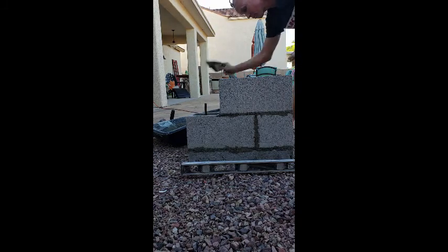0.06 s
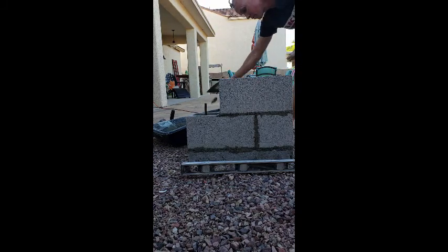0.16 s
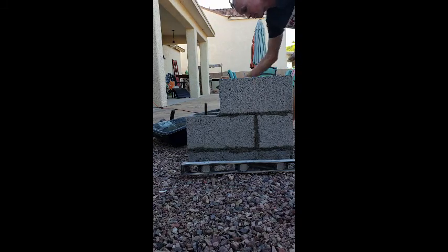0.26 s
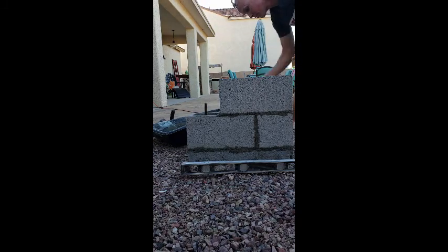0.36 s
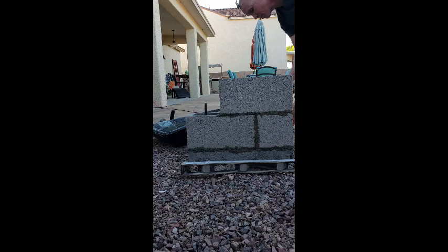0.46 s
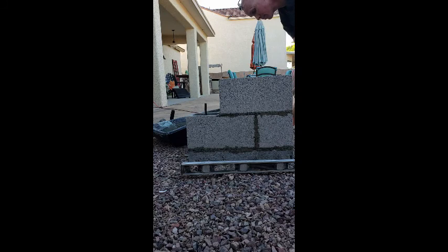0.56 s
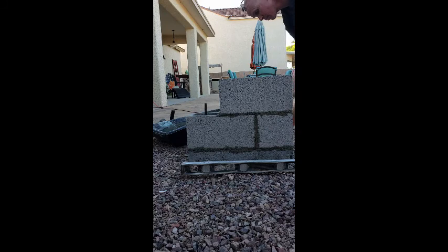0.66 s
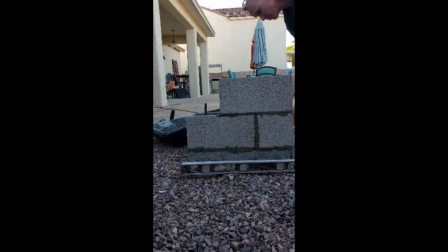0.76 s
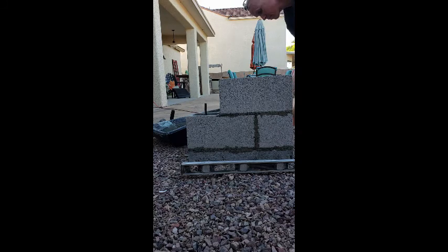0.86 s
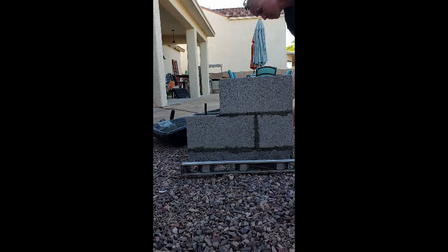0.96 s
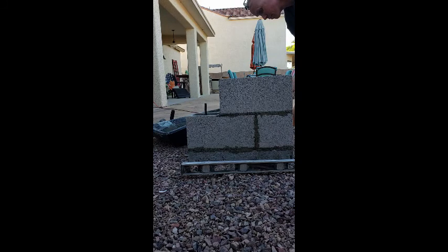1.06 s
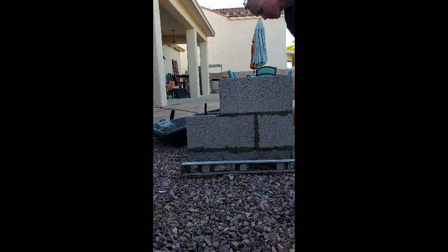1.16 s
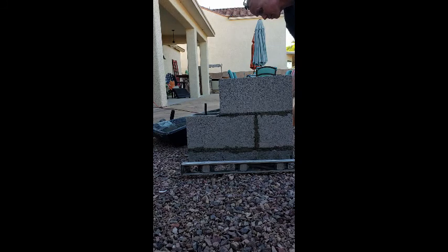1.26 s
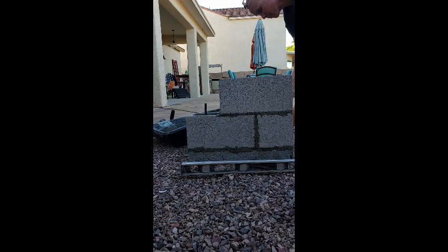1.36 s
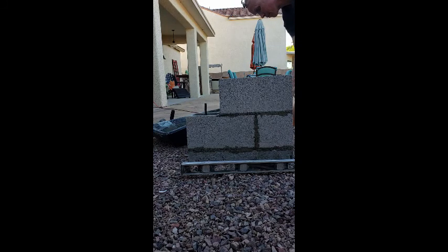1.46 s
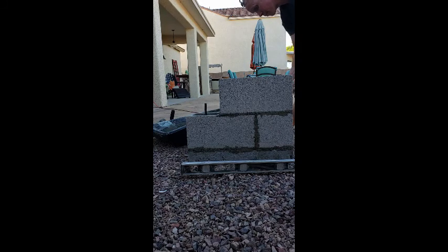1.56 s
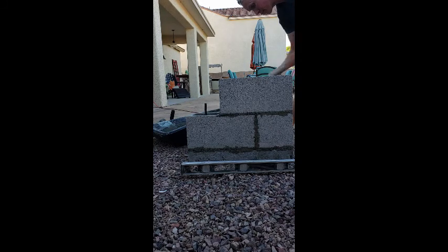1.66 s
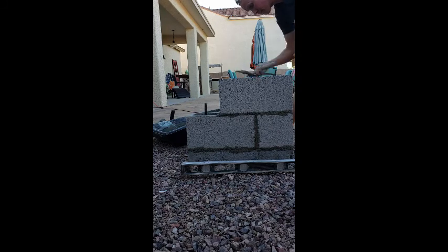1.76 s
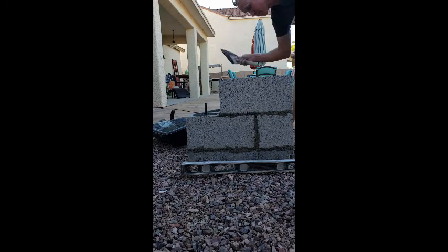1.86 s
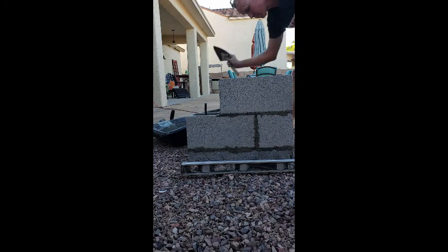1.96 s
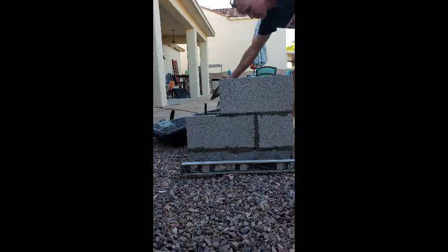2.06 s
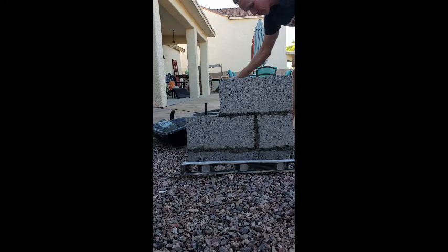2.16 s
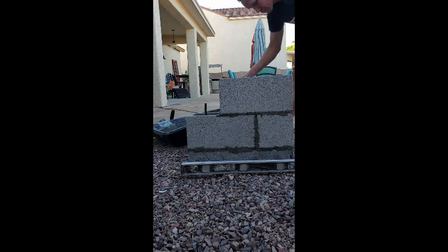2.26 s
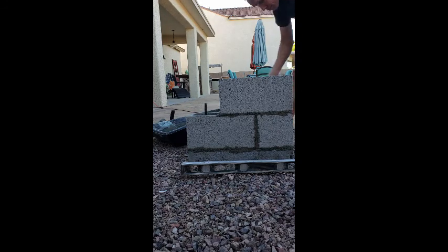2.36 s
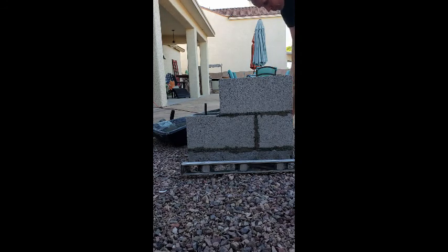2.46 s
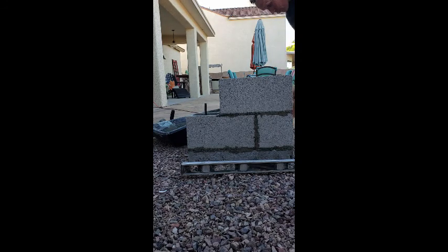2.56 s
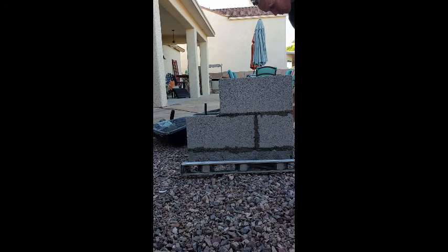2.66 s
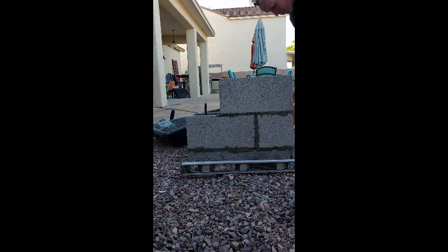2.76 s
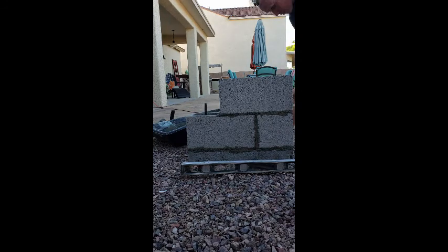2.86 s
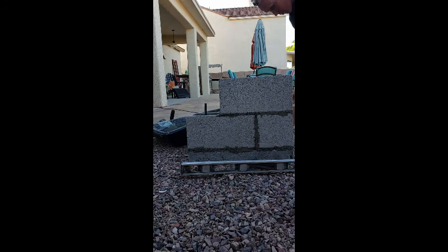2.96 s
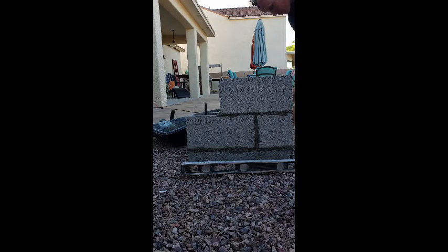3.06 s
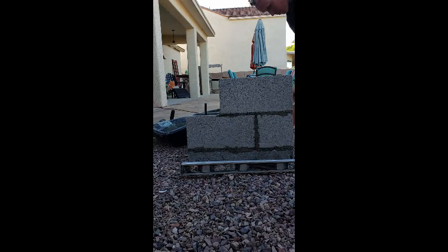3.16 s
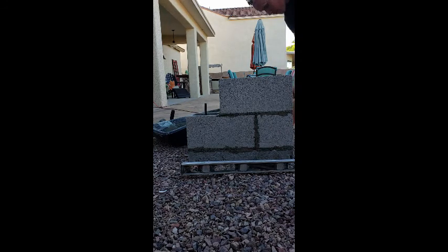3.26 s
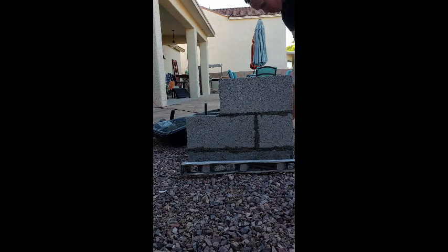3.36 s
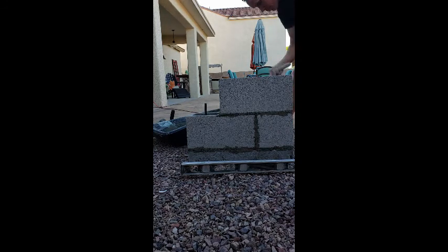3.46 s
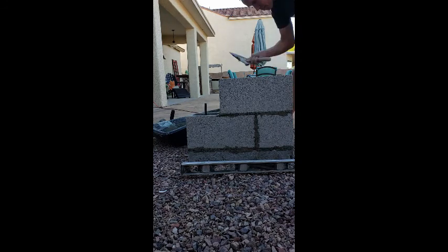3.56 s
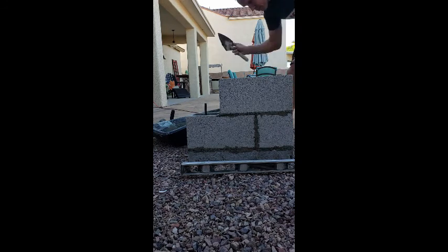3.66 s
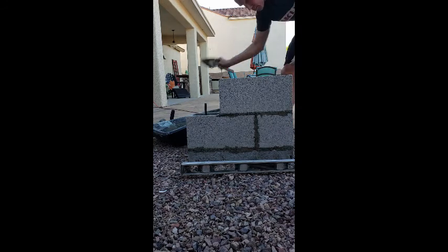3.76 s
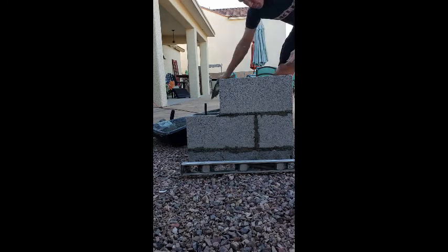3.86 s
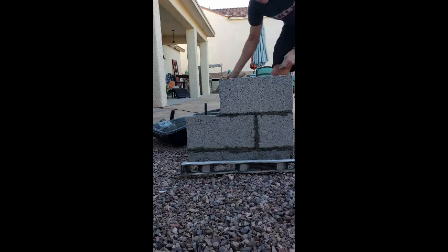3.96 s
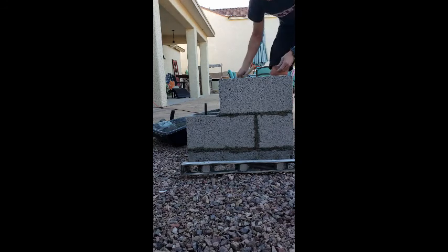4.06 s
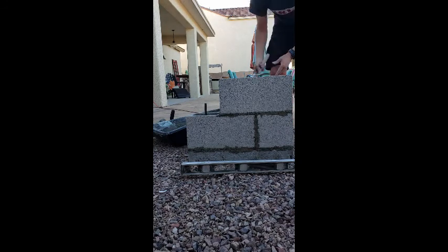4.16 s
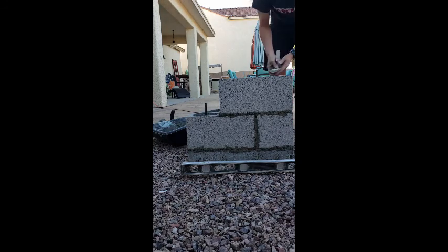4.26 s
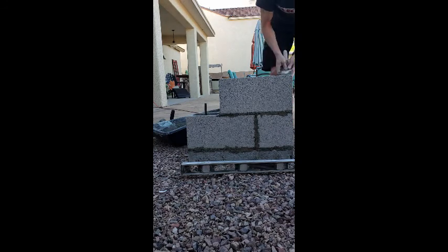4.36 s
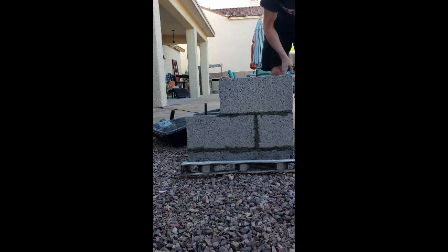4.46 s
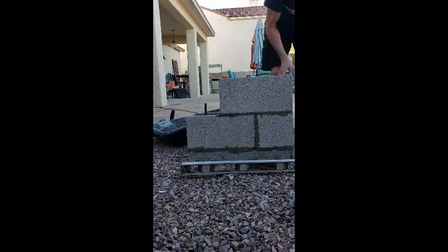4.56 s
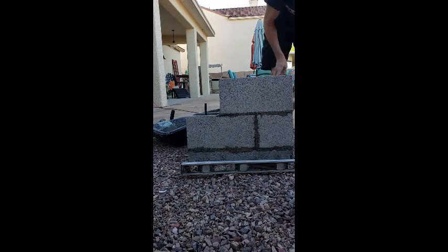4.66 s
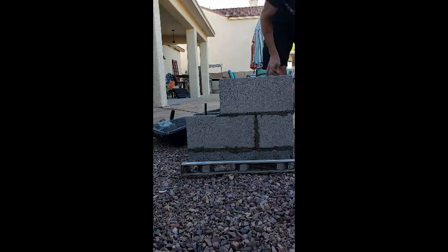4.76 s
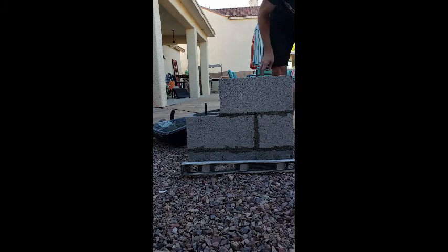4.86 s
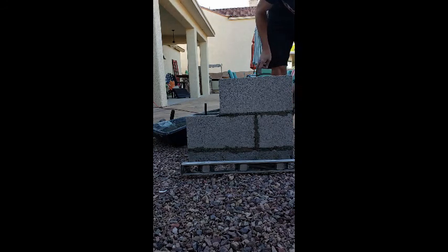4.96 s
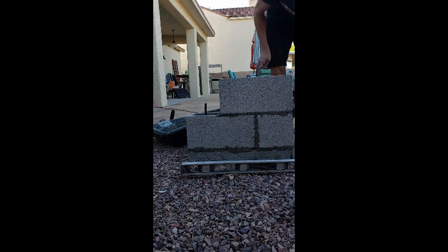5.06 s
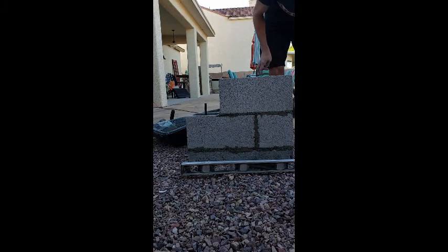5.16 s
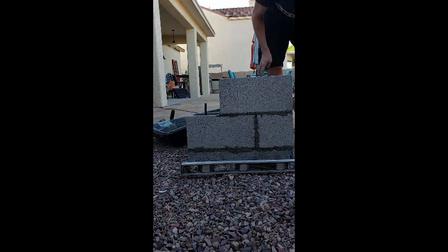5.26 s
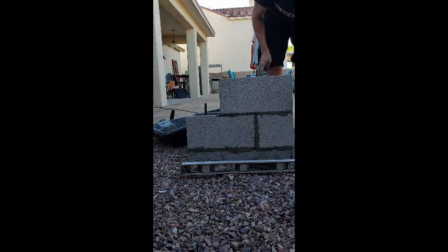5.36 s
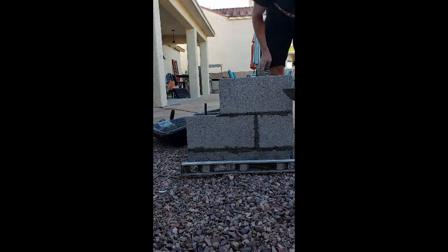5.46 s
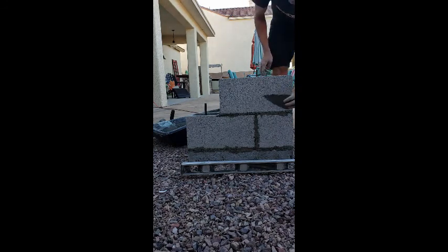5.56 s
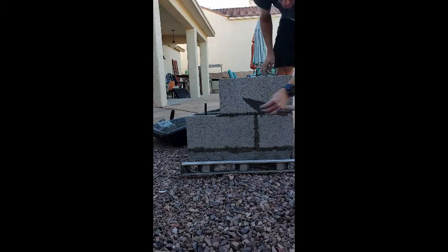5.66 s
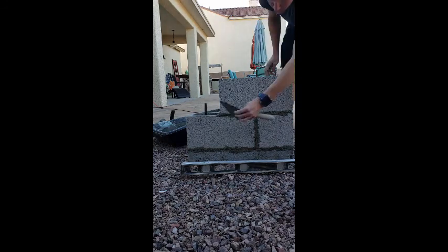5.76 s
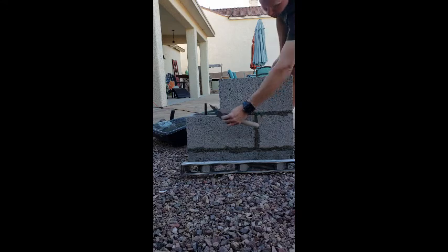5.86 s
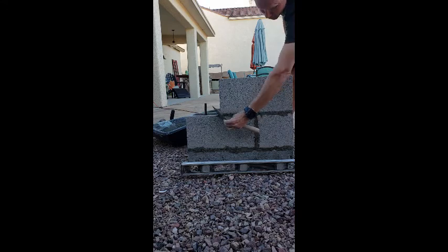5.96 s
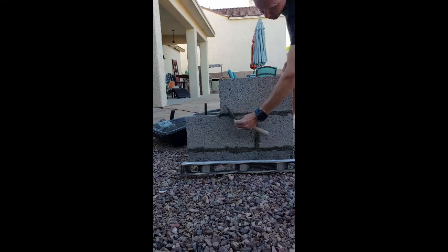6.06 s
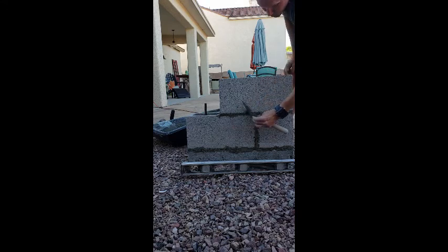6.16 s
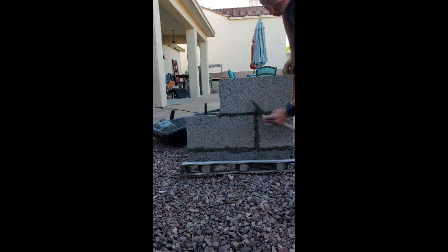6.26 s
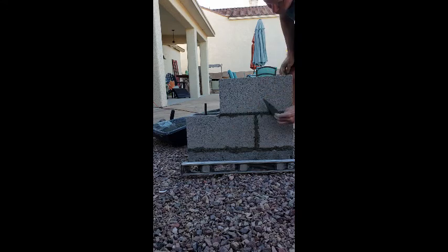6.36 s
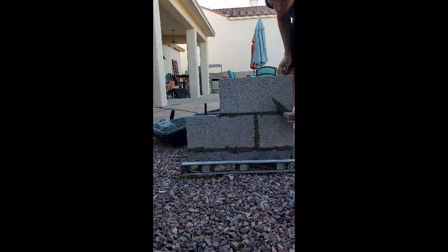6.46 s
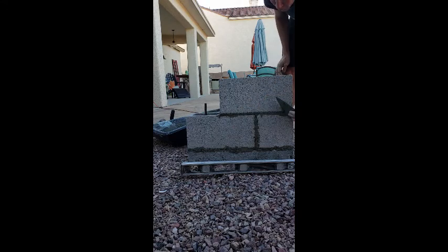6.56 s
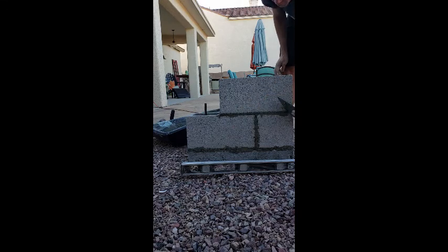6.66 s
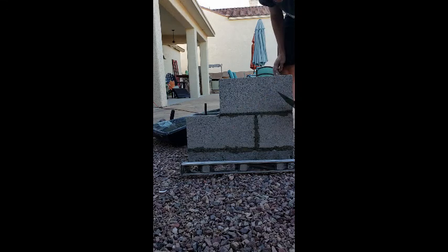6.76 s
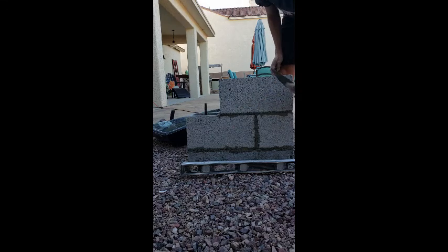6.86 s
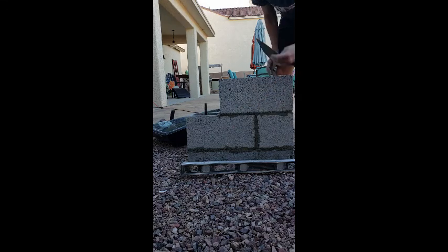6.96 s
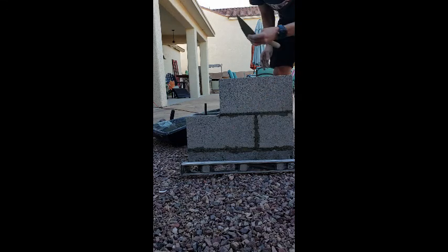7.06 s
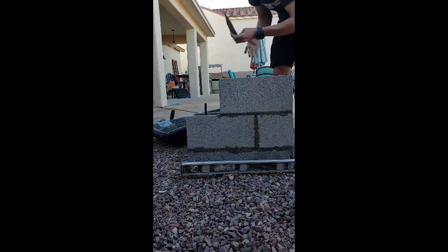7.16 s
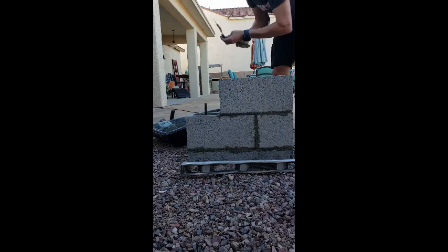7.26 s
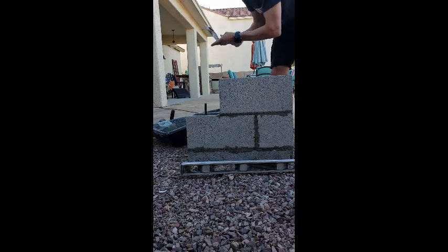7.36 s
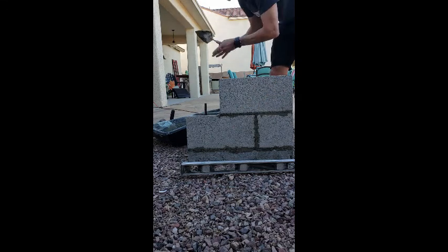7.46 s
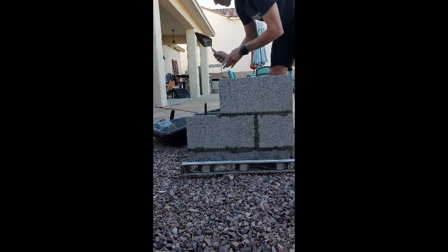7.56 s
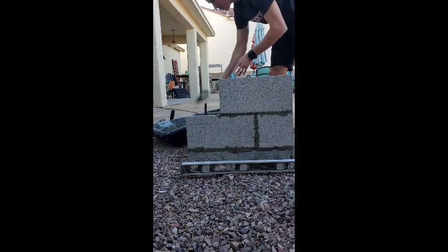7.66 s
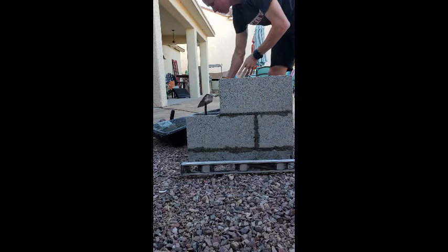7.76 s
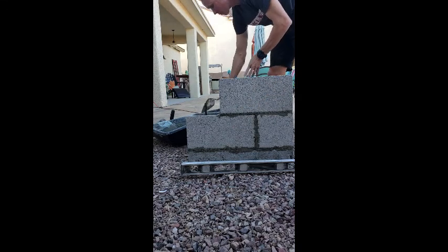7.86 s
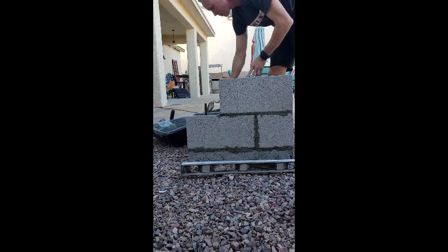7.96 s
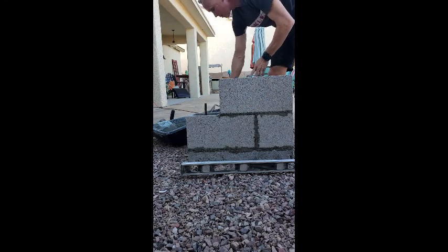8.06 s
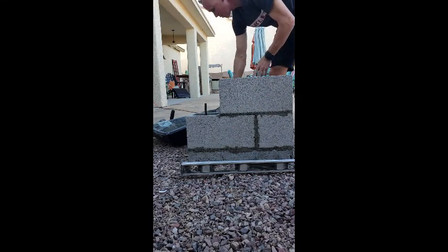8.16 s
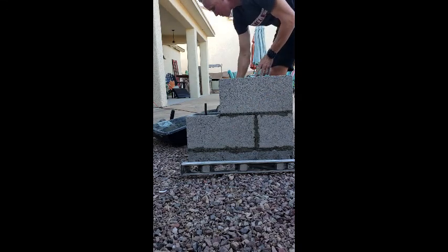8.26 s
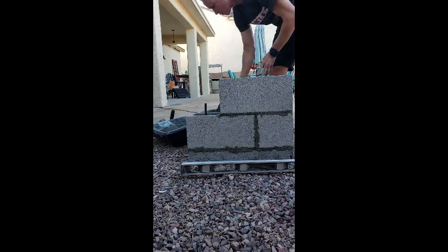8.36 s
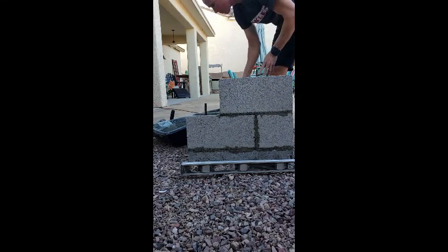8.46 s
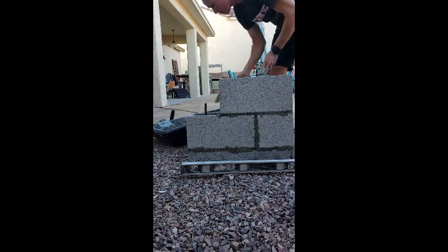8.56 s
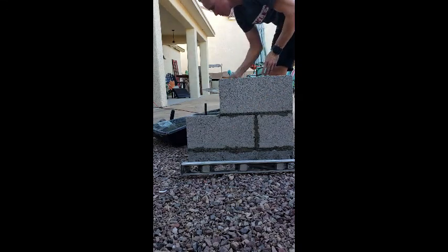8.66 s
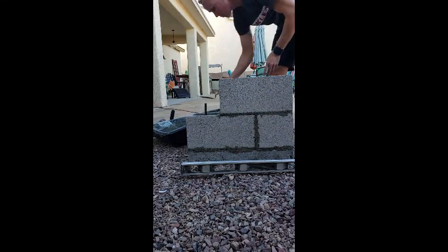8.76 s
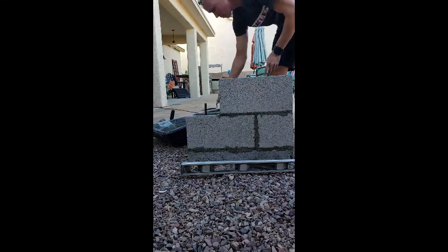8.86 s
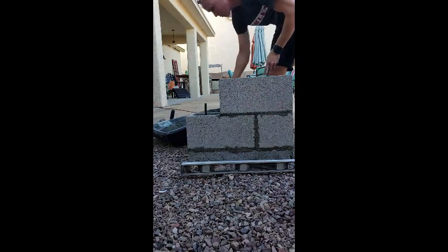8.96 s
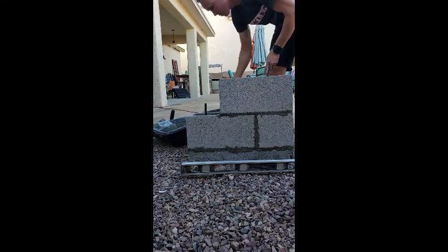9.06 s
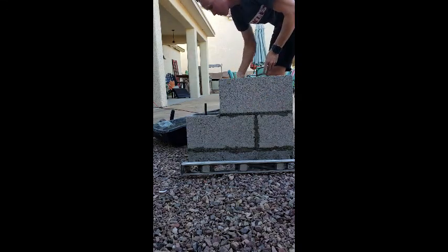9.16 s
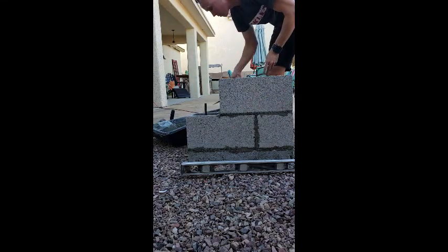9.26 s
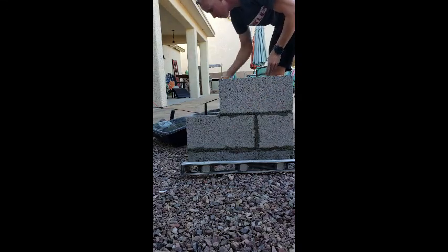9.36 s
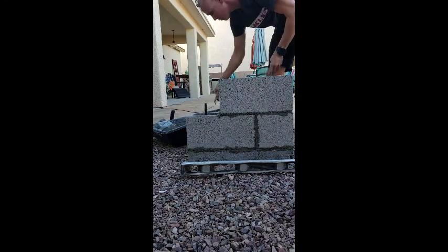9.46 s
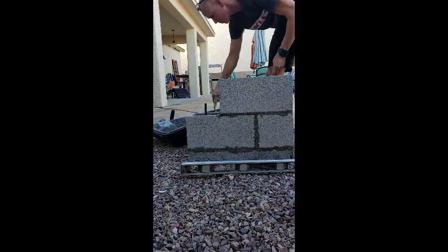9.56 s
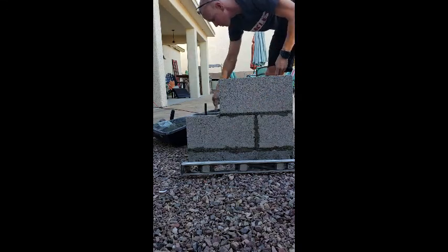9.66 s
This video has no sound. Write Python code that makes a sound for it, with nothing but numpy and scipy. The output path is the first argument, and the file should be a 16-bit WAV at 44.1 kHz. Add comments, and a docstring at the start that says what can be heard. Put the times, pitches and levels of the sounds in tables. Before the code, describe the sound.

A back yard with low rumble, thin hiss and a faint distant machine hum throughout; the trowel is close, with short reflections from house walls. From 0 to 1.4 s there are faint scrapes, small ticks and soft block knocks. Around 1.5 s two sharp ticks land with a short scrape. A large dog barks far off at 1.8 s, and a low thump falls at 2.4. Light gritty strokes follow from 2.7 to 3.3, the last stronger. From 3.4 to 4.6 there is quiet mortar smearing, with knocks, gravel clacks and falling crumbs. Harsh, squealing edge scrapes come at 4.8 to 5.3, with a bark at 5.2, and gravel clicks at 5.6. A long loud rasp runs 5.9 to 6.7, overlapping another bark. Then it is sparse: a very faint bark at 7.3, a short one at 8.0, knocks and scraping at 8.15, a brief steel ring at 8.45, and a solid dull knock with mortar scrape at 8.9.

```python
"""Back yard: a steel trowel scrapes wet mortar off a low concrete block wall.
Blade: random sand-grain snaps shaped by push and steel resonances, plus ticks, skids and squeals.
Blocks knock, one low thump falls and gravel clacks: damped tones and filtered noise bursts.
Far off, a large dog barks five times: rough pulses through throat resonances.
Background: low rumble and thin hiss of filtered noise, and a faint machine hum of wavering sines."""
import sys
import numpy as np
from scipy import signal
from scipy.fft import rfft, irfft
from scipy.io import wavfile

SR = 44100
rng = np.random.default_rng(int(sys.argv[2]) if len(sys.argv) > 2 else 0)


def unload_audio(sound):
    """Save the sound as a 16-bit wav file, at the path given as the first command line argument."""
    columns = np.transpose(np.atleast_2d(sound))
    # keep every value between -1 and 1, then stretch to whole-number steps
    steps = np.round(np.clip(columns, -1, 1) * 32767)
    wavfile.write(sys.argv[1], SR, steps.astype(np.int16))


N = 428634
TIME = np.arange(N) / SR
HZ = np.fft.rfftfreq(4096, 1 / SR)
BAND_EDGE_HZ = 16050


# blade colour, one table per way of holding it: hz, density_db_per_hz (relative)
LIGHT_COLOUR = [(150, -26), (340, -7.5), (560, -13), (780, -18), (950, -6.5), (1150, -14), (1500, -7),
                (2000, -9.5), (3400, -3), (5000, -3), (6500, -7), (9500, -9.5), (12200, 3), (16000, -6.5)]
EDGE_COLOUR = [(150, -19), (330, -12), (520, -13.5), (750, -13.5), (940, -8.5), (1160, -23), (1450, -12.5),
               (1900, -9.5), (2900, -7), (5000, -9.5), (7200, -10.5), (9400, -12.5), (11000, -6.5),
               (12400, 3), (16000, -13.5)]
FACE_COLOUR = [(150, -20.5), (300, -15), (520, -1.5), (690, -13.5), (880, 1), (1120, -6.5), (1350, 0.5),
               (2050, -10.5), (2700, -2), (3300, 0), (5100, -3), (6000, -11.5), (7400, -4.5), (10000, -15),
               (12400, 0), (16000, -8)]
MORTAR_COLOUR = [(50, -23), (120, -1.5), (220, -8.5), (330, -3), (490, 4.5), (620, -3.5), (720, -5.5),
                 (1200, -12.5), (1420, -12), (1800, -14.5), (2450, -13), (3400, -13.5), (5000, -14.5),
                 (9500, -23), (12300, -13.5), (16000, -23)]


def trowel():
    """Four ways of working the blade, each with its own grit and colour."""
    light = singing(scrape("light", grit(2200, 3.5, 0.94, 180), level_db=0.0))
    light = light + ticks() + crumbs()
    edge = singing(scrape("edge", grit(6000, 3.6, 1.3, 260), level_db=-0.5) + skids())
    face = scrape("face", grit(5000, 3.1, 2.4, 300), level_db=-1.5)
    mortar = scrape("mortar", grit(4000, 4.0, 1.33, 220), level_db=1.5)
    return (roaming(light, lambda: steel(LIGHT_COLOUR, ring_db=-2.0))
            + roaming(edge, lambda: steel(EDGE_COLOUR, ring_db=0.0))
            + roaming(face, lambda: steel(FACE_COLOUR, ring_db=-1.0, side=0.35))
            + roaming(mortar, lambda: steel(MORTAR_COLOUR, ring_db=-5, side=0.24)))


# trowel strokes: start_s, lean_in_s, hold_s, ease_off_s, level_db (before the way's level),
# low_body_db, way
STROKES = [ (0.133, 0.042, .005, .03, -56, -14.5, "light"), (.29, 0.015, .01, .06, -56.5, 9, "light"),
           (0.358, .01, .01, 0.07, -61.5, 5, "light"), (1.126, 0.12, 0.0073, .11, -39.5, 0.5, "light"),
           (1.411, 0.1, 0.012, 0.024, -48, -2.5, "light"), (1.496, 0.052, 0.052, 0.031, -38, 13, "light"),
           (2.056, .025, .005, 0.046, -54, -2, "light"), (2.131, 0.011, 0.019, 0.084, -53, 16, "light"),
           (2.662, 0.0068, 0.026, 0.028, -48.5, 1.5, "light"),
           (2.744, 0.021, 0.027, 0.018, -53.5, -2, "light"),
           (2.793, 0.028, 0.0126, 0.097, -41, -2.5, "light"),
           (2.976, 0.023, 0.033, 0.05, -48.5, -9, "light"),
           (3.055, 0.027, 0.114, 0.021, -59.5, -21, "light"),
           (3.203, 0.11, 0.045, 0.051, -31, 1.5, "light"), (3.437, 0.21, 0.77, 0.23, -67.5, -0.5, "mortar"),
           (3.862, 0.062, 0.0085, 0.061, -59.5, -4.5, "mortar"),
           (4.06, 0.071, .005, 0.03, -47.5, 1, "light"), (4.153, 0.045, 0.0079, 0.021, -61, 1, "mortar"),
           (4.37, 0.17, .025, 0.055, -61, -18, "light"), (4.68, 0.013, 0.066, 0.022, -65, -5, "light"),
           (4.825, 0.12, 0.043, 0.11, -28, 0.5, "edge"), (5.037, 0.053, 0.13, .03, -30, -0.5, "edge"),
           (5.53, 0.035, 0.048, 0.02, -48, 5, "edge"), (5.618, 0.039, 0.043, 0.067, -57, 2, "edge"),
           (5.932, .24, .19, 0.32, -22.5, -1, "face"), (6.651, .014, 0.025, 0.049, -41, 7.5, "face"),
           (7.73, .02, 0.046, 0.077, -69.5, 2.5, "mortar"), (8.159, .012, 0.036, 0.14, -47, 0, "mortar"),
           (8.244, .16, .04, 0.071, -44.5, -0.5, "mortar"),
           (8.935, 0.013, 0.12, 0.056, -42.5, -2.5, "mortar")]
JUDDER_DB, JUDDER_HZ = 2.5, 72


def scrape(way, grains, level_db):
    """Push sets the snap size; low body varies per stroke; the blade judders when the push is slack."""
    force, body = np.zeros(N), np.zeros(N)
    for start_s, rise_s, hold_s, fall_s, stroke_db, body_db, held in STROKES:
        if held == way:
            effort = push(rise_s, hold_s, fall_s)
            judder_db = JUDDER_DB * (1 - effort) * wander(JUDDER_HZ, count=len(effort))
            stroke = gain_of(stroke_db) * effort * gain_of(judder_db)
            add(force, start_s, stroke)
            add(body, start_s, stroke * (gain_of(body_db) - 1))
    return gain_of(level_db) * (force * grains + body * below(grains, 2400))


TOUCH_DB, PUSH_CURVE = -25, 1.6  # start and end level below hold; slope exponent


def push(rise_s, hold_s, fall_s):
    """Attack, hold and release of an effort, as a gain."""
    t = np.arange(0, rise_s + hold_s + fall_s, 1 / SR)
    slack = np.maximum(np.maximum(1 - t / rise_s, (t - rise_s - hold_s) / fall_s), 0)
    return gain_of(TOUCH_DB * slack ** PUSH_CURVE) * signal.windows.tukey(len(t), .04)


def grit(per_s, spread_db, chatter_db, chatter_hz):
    """Sand grains snap under the blade, a few large, in clumps as it sticks and slips."""
    size_db = spread_db * np.minimum(rng.exponential(1, N), 4)
    size = gain_of(size_db) * rng.choice([-1., 1.], N)
    snaps = rng.random(N) < per_s / SR
    chatter = gain_of(chatter_db * np.clip(wander(chatter_hz), -2, 2))
    return evened(size * snaps * chatter)


# edge catches and sings a fuzzy note: start_s, length_s, pitch_hz, over_grit_db (before level_db)
SQUEALS = [(2.805, .05, 3380, 13.5), (4.915, .09, 2430, 13), (5.044, .055, 2280, 14),
           (5.089, .04, 2550, 13.5), (5.126, .21, 2460, 6.5)]


def singing(drive, width_hz=190, level_db=-2, waver=0.02, waver_hz=45):
    """Adds a resonance to the grit while the edge catches; pitch wavers with the contact point."""
    out = drive.copy()
    r = np.exp(-np.pi * width_hz / SR)
    for start_s, length_s, pitch_hz, squeal_db in SQUEALS:
        grains = drive[round(start_s * SR):][:round(length_s * SR)]
        wavering_hz = pitch_hz * (1 + waver * wander(waver_hz, count=len(grains)))
        turn = np.exp(2j * np.pi * np.cumsum(wavering_hz) / SR)
        # shift to 0 Hz, low-pass, shift back: a resonance of moving pitch
        slow = signal.lfilter([1 - r], [1, -r], grains / turn + 1e-18)
        note = 2 * (turn * slow).real
        add(out, start_s, gain_of(squeal_db + level_db) * note * signal.windows.tukey(len(note), .4))
    return out


# blade ticks on a stone: start_s, level_db (before ticks' level_db), body_below_2khz_db
TICKS = [(0.171, -51, -10), (0.2937, -52, 8), (0.6834, -38.5, -8), (.822, -36.5, -5), (.9778, -40.5, -9.5),
         (1.0216, -43, -15), (1.045, -39, -11), (1.108, -38, -2), (1.1668, -31, 4), (1.506, -16.5, -3.5),
         (1.5394, -18, 3), (2.1455, -42, 20), (2.6658, -27.5, -1), (2.882, -28, 1), (2.999, -38, -40),
         (3.1035, -38, -24), (3.755, -43, 6), (4.359, -50, -10), (4.489, -44, 16.5), (4.8242, -25, 17.5),
         (4.863, -26, -4), (5.5107, -34, 4.5), (5.5333, -30, -7), (5.892, -37.5, 5), (5.9473, -24, 14),
         (6.599, -34, -9), (8.142, -39, 5), (8.172, -31.5, 3), (8.2325, -43.5, 0), (8.4372, -26, 11),
         (8.942, -36, 22)]


def ticks(level_db=-9, fade_s=0.0031, crumble_db=-16, crumble_s=0.036):
    """A sharp noise crack where the blade meets a stone, then a little crumbling."""
    drive, t = np.zeros(N), TIME[:8192]
    fade = np.exp(-t / fade_s) + gain_of(crumble_db) * np.exp(-t / crumble_s)
    for start_s, tick_db, body_db in TICKS:
        crack = rng.standard_normal(len(t))
        crack = crack + (gain_of(body_db) - 1) * below(crack, 2000)
        add(drive, start_s, gain_of(tick_db + level_db) * fade * crack)
    return drive


# blade bites and skids: start_s, length_s (before the closing ramp), level_db (before skids' level_db)
SKIDS = [(1.534, 0.0098, -38.5), (2.814, 0.035, -49), (4.994, 0.0098, -34.5), (5.076, 0.029, -34.5),
         (5.176, 0.0083, -25), (5.225, 0.032, -22), (5.287, 0.036, -23.5), (5.546, 0.0061, -48.5),
         (6.323, 0.012, -39), (6.556, 0.0082, -23.5), (6.62, 0.018, -36), (6.658, 0.0095, -29.5),
         (6.687, 0.0084, -33.5)]


def skids(level_db=2, ramp_s=.002):
    """Short hard rasps where the edge breaks through the mortar onto bare concrete."""
    force = np.zeros(N)
    for start_s, length_s, skid_db in SKIDS:
        inside_s = np.minimum(TIME - start_s, start_s + length_s + ramp_s - TIME)
        force += gain_of(skid_db) * np.clip(inside_s / ramp_s, 0, 1)
    return gain_of(level_db) * force * grit(12000, 1.8, 2.1, 500)


CRUMBS_START_S, CRUMBS_END_S, CRUMBS_DB = 3.65, 4.56, -64.5


def crumbs(per_s=70, spread_db=3):
    """Single loose grains drop on the steel."""
    during = (TIME > CRUMBS_START_S) & (TIME < CRUMBS_END_S)
    return gain_of(CRUMBS_DB) * during * grit(per_s, spread_db, 1.33, 15)


# blade modes: hz (before drift), width_hz, over_plain_grit_db (before ring_db)
BLADE_MODES = [(930.3, 120, 5), (1396, 120, 7.5), (1424, 33, -4.5), (1870, 22, -4), (2354, 100, 4.5),
               (2460, 51, -13.5), (2820, 50, 1.5), (3350, 52, 9.5), (4170, 70, -2), (4630, 90, 4.5),
               (5110, 320, 6), (6790, 740, 1.5), (7650, 172, 1)]
# stereo balance: hz, left_minus_right_db (before side)
BALANCE = [(300, 1), (900, -3.5), (2200, -9), (4000, -8.5), (8000, 5), (10500, -9.5), (12500, -11.5),
           (16000, 1)]


def steel(colour, ring_db, side=0.59, drift=0.012):
    """Stereo grain response: a broad colour and the blade's modes, which shift with the contact point."""
    modes = np.zeros(len(HZ))
    for mode_hz, width_hz, mode_db in BLADE_MODES:
        shifted_hz = mode_hz * (1 + drift * (2 * rng.random() - 1))
        modes += gain_of(mode_db + ring_db) ** 2 / (1 + (2 * (HZ - shifted_hz) / width_hz) ** 2)
    gain = gain_of(read(colour, HZ)) * np.sqrt(1 + modes)
    gain /= np.sqrt(np.mean(gain ** 2 * (HZ > 4000) * (HZ < BAND_EDGE_HZ)))
    ears = gain * gain_of(side * read(BALANCE, HZ) * np.array([[.5], [-.5]]))
    # minimum phase: the ringing follows the snap
    cepstrum = irfft(np.log(ears + 1e-6))
    cepstrum[:, 1:2048] *= 2
    cepstrum[:, 2049:] = 0
    return irfft(np.exp(rfft(cepstrum)))


# blade lifts off: start_s, level_db (before mode_db)
LIFTS = [(6.734, -59), (8.457, -35), (9.08, -48)]
# free blade modes: hz, mode_db, t60_s (before damping)
FREE_BLADE_MODES = [(1840, -1.5, 0.19), (2422, -1, 0.11), (2740, -17, 0.28), (3344, -10, 0.32),
                    (5260, -16, 0.42)]
BLADE_DAMPING = 0.82  # share of t60 that the wet blade keeps


def pings(level_db=0):
    """Free of the mortar, the steel rings on for a moment in damped modes."""
    out = np.zeros(N)
    for start_s, lift_db in LIFTS:
        for hz, mode_db, t60_s in FREE_BLADE_MODES:
            ring_on = blow(hz, t60_s * BLADE_DAMPING, noise_db=-9)
            add(out, start_s, gain_of(lift_db + mode_db + level_db) * ring_on)
    return out


# dull knocks on the blocks, and one low thump at 2.363 s, a footfall or wind buffet:
# start_s, level_db, pitch_hz, t60_s
KNOCKS_AND_THUMP = [(0.292, -38, 445, 0.06), (.690, -44, 341, 0.16), (1.051, -47, 336, 0.16),
                    (1.238, -46.5, 334, 0.32), (1.565, -34, 338, 0.14), (2.147, -31, 440, 0.074),
                    (2.363, -22, 86.9, 0.037), (3.929, -26.5, 470, 0.027), (4.208, -36, 410, 0.02),
                    (8.144, -29, 487, 0.072), (8.161, -29, 123, 0.19), (8.176, -32.5, 394, 0.15),
                    (8.941, -17.5, 323, 0.046)]
# gravel clacks underfoot: start_s, level_db (before gravel_db), pitch_hz
GRAVEL = [(3.7544, -40, 1000), (3.8267, -43, 991), (4.1442, -34, 1150), (4.373, -36, 1230),
          (4.401, -40, 1270), (5.6083, -25.5, 1740), (5.624, -32.5, 1490), (9.3322, -46, 985)]
STEP_START_S, STEP_END_S = 3.85, 4.52
PEBBLE_DB, PEBBLE_HZ = -45, 1400  # centres of random spreads; level is before gravel_db


def knocks_and_gravel(dull_db=0, gravel_db=-5, gravel_s=0.003, count=10):
    """Block knocks and the low thump die fast; gravel and random small pebbles give short, dry clicks."""
    out, t = np.zeros(N), TIME[:2048]
    for start_s, level_db, hz, t60_s in KNOCKS_AND_THUMP:
        add(out, start_s, gain_of(level_db + dull_db) * blow(hz, t60_s, noise_db=-5.0))
    pebbles = []
    for when, size, pitch in rng.random((count, 3)):
        start_s = np.interp(when, [0, 1], [STEP_START_S, STEP_END_S])
        pebbles.append((start_s, PEBBLE_DB + 6 * (size - .5), PEBBLE_HZ * 2 ** (pitch - .5)))
    for start_s, level_db, hz in GRAVEL + pebbles:
        click = evened(resonate(rng.standard_normal(len(t)), hz, hz * .9))
        add(out, start_s, gain_of(level_db + gravel_db) * click * np.exp(-t / gravel_s))
    return out


def blow(hz, t60_s, noise_db):
    """A damped sine blurred by a band of noise."""
    t = TIME[:8192]
    width_hz = hz * 1.25
    blur = evened(resonate(resonate(rng.standard_normal(len(t)), hz, width_hz), hz, width_hz))
    fade = np.exp(-np.log(1000) * t / t60_s) * (1 - np.exp(-2 * t * hz))
    tone = np.sin(2 * np.pi * hz * t)
    return fade * (tone + gain_of(noise_db) * blur) / np.sqrt(1 + gain_of(noise_db) ** 2)


# barks: start_s, length_s, throat_db (before level_db), level_change_db (start to end),
# upper_at_end_db, upper_extra_at_start_db, pitch_hz (before arch and jitter), roughness_0_1
BARKS = [(1.843, 0.22, -33.5, -12, -0.5, -0.5, 271.8, 0.79), (5.172, 0.16, -29, -0.5, -1, 1.5, 262.6, 0.71),
         (5.885, .155, -30.5, 3, 6, -6.5, 271.8, 0.91), (7.291, .16, -55, -20, 7, -28, 280.6, 0.41),
         (8.022, 0.069, -38, 0, -12, -34, 286.2, 0.62)]
# throat resonances, lowest first: hz, width_hz (before widening), level_db
THROAT = [(260, 26, -1.5), (566.4, 105, 4.5), (710, 90, -3), (1027, 230, 1.5), (1310, 540, -10),
          (2900, 170, -24.5), (7040, 730, -24.5)]
BARK_RISE, BARK_FALL = 0.26, 0.19  # shares of bark length
JAW_HISS_DB, JAW_HISS_HZ = -56, 4200


def dog(level_db=0, arch=0.093, jitter=0.036, widening=1.5):
    """Rough pulses on a pitch arch pass the throat; the mouth sets the upper resonances, air hisses out."""
    out = np.zeros(N)
    for start_s, length_s, throat_db, change_db, mouth_db, shut_db, pitch_hz, rough in BARKS:
        hold_s = length_s * (1 - BARK_RISE - BARK_FALL)
        effort = push(length_s * BARK_RISE, hold_s, length_s * BARK_FALL)
        along, rough = np.linspace(0, 1, len(effort)), np.clip(rough, 0, 1)
        bend = arch * (np.sin(np.pi * along) - .8)
        bend = bend + jitter * rough * wander(200, count=len(along))
        turns = np.cumsum(pitch_hz * (1 + bend)) / SR
        folds = evened(sum(np.cos(2 * np.pi * k * turns) for k in range(1, 28)))
        puffs = evened((0.31 + np.exp(-(turns % 1) / .3)) * rng.standard_normal(len(along)))
        drive = (1 - rough) * folds + 2 * rough * puffs
        parts = []
        for hz, width_hz, part_db in THROAT:
            wide_hz = width_hz * widening
            part = resonate(resonate(drive, hz, wide_hz), hz, wide_hz)
            parts.append(gain_of(part_db) * evened(part))
        chest, low, *upper = parts
        mouth = gain_of(mouth_db + shut_db * (1 - along))
        voice = (1 - rough) ** 2 * chest + low + mouth * sum(upper)
        voice = gain_of(throat_db + level_db + change_db * (along - .5)) * voice
        hiss = along * evened(resonate(rng.standard_normal(len(along)), JAW_HISS_HZ, JAW_HISS_HZ))
        add(out, start_s, effort * (voice + gain_of(JAW_HISS_DB) * below(hiss, 7500)))
    return out


def lingering(x, hz=960, width_hz=2.3, level_db=9, until_s=2.3):
    """A narrow resonance leaves a faint tone hanging on after the first bark."""
    return gain_of(level_db) * resonate(x * (TIME < until_s), hz, width_hz)


# noise floor shape: hz, density_db_per_hz (relative)
FLOOR = [(20, -24), (40, -6.5), (58, -7), (75, 0), (110, -3), (200, -11), (400, -12.5), (650, -17),
         (900, -28), (1900, -34.5), (5000, -33), (7000, -39.5), (9200, -48.5), (12300, -37.5), (16000, -44)]
# rumble and hum swell: time_s, about_usual_level_db
SWELL = [(0, 4), (.7, -1), (2.3, 0.5), (4.6, -1), (6.2, -1), (7.0, -5), (7.7, -3.5), (8.7, -0.5), (9.7, -2)]
# machine hum: hz, level_db (before swell)
HUM = [(57, -58), (120, -71), (240, -69)]
# noise likeness of the two sides: hz, correlation
LIKENESS = [(30, .8), (120, 0.93), (400, 1), (1000, .6), (3000, 0.1), (15000, .1)]


def outdoors(rumble_db=-53.5, gust_db=-1.0):
    """A low rumble that swells slowly and flickers, thin steady hiss and a far machine's wavering hum."""
    hz = np.fft.rfftfreq(N, 1 / SR)
    left, other = rfft(rng.standard_normal((2, N)))
    same = np.clip(read(LIKENESS, hz), -1, 1)
    sides = np.array([left, same * left + np.sqrt(1 - same ** 2) * other])
    noise = gain_of(rumble_db) * evened(irfft(sides * gain_of(read(FLOOR, hz)), N))
    low = below(noise, 1500)
    hum = np.zeros((2, N))
    for hum_hz, hum_db in HUM:
        phase = 2 * np.pi * hum_hz * TIME + wander(6.5) + np.array([[0], [.7]])
        hum += gain_of(hum_db) * np.sqrt(2) * np.sin(phase)
    swell = gain_of(np.interp(TIME, *np.transpose(SWELL)) + gust_db * wander(11))
    return (low + hum) * swell * gain_of([[.9], [-.9]]) + noise - low


def scatter(early_db, early_s, lag, mono_hz=900):
    """Direct sound, later on the right by about lag samples, then scatter off ground and blocks."""
    t = TIME[:4096]
    right_lag = lag * rng.uniform(.3, 1.5)
    direct = np.array([np.sinc(t * SR - 8), np.sinc(t * SR - 8 - right_lag)])
    early = rng.standard_normal((2, len(t)))
    early += below(early[0] - early, mono_hz)  # bass alike on both sides
    early = evened(early * np.exp(-t / early_s) * (t > .0004)) / np.sqrt(len(t))
    return (direct + gain_of(early_db) * early) / np.sqrt(1 + gain_of(early_db) ** 2)


# yard tail: hz, t60_s
YARD = [(200, .55), (900, 0.49), (3000, 0.38), (7000, 0.3), (15000, 0.11)]


def yard(x, step_s=.07, mono_hz=480):
    """Tail between the house walls: sparse reflections, treble dying first, bass alike on both sides."""
    def tail():
        signs = rng.choice([-1., 1.], (2, 24000))
        taps = signs * (rng.random((2, 24000)) < .15) * (TIME[:24000] > .01)
        taps += below(taps[0] - taps, mono_hz)
        hz, when_s, z = signal.stft(taps, SR, nperseg=256)
        decay = gain_of(-60 * when_s / read(YARD, hz)[:, None])
        response = signal.istft(z * decay, SR, nperseg=256)[1]
        return response / np.linalg.norm(response[0])
    return roaming(x, tail, step_s, count=3)


def roaming(x, draw_response, step_s=.09, count=7):
    """A moving source: its sound fades from one place's response into the next, in a cycle."""
    place = TIME / step_s
    out = np.zeros((2, N))
    for k in range(count):
        share = np.sin(np.pi / 2 * np.maximum(1 - abs((place - k) % count - 1), 0))
        out += ring(x * share, draw_response())
    return out


def ring(x, response):
    """Plays a drive through a left and a right response."""
    return signal.oaconvolve(np.atleast_2d(x), response, axes=1)[:, :N]


def resonate(x, hz, width_hz):
    """A two-pole resonance with a peak gain of one."""
    return signal.lfilter(*signal.iirpeak(hz, hz / width_hz, fs=SR), x)


def below(x, hz):
    """Low-pass without delay."""
    return irfft(rfft(x) / (1 + (np.fft.rfftfreq(x.shape[-1], 1 / SR) / hz) ** 4), x.shape[-1])


def wander(hz, count=N):
    """Random line of unit rms that changes course hz times a second."""
    knots = rng.standard_normal(count // 16 + 4)
    return evened(np.interp(np.arange(count) * hz / SR, np.arange(len(knots)), knots))


def gain_of(db):
    """Decibels to amplitude."""
    return 10 ** (np.asarray(db) / 20)


def evened(x):
    """Scales to an rms of one."""
    return x / np.sqrt(np.mean(x ** 2) + 1e-20)


def read(points, hz):
    """Reads a spectrum table on a log-frequency axis."""
    f, value = np.transpose(points)
    return np.interp(np.log(hz + 1), np.log(f + 1), value)


def add(mix, start_s, sound):
    """Mixes a sound in at start_s."""
    part = mix[max(round(start_s * SR), 0):][:len(sound)]
    part += sound[:len(part)]


def scene():
    """The trowel is near, the dog far off with its own longer scatter; both feed the yard tail."""
    near = roaming(trowel() + knocks_and_gravel() + pings(),
                   lambda: scatter(early_db=3.5, early_s=0.0037, lag=3.1, mono_hz=1010))
    barks = dog(level_db=-1.5)
    far = roaming(barks, lambda: scatter(early_db=-2.0, early_s=0.057, lag=6.5, mono_hz=650),
                  step_s=.05, count=3)
    tail = yard(gain_of(-14.5) * near + gain_of(-8.0) * far)
    return near + far + lingering(barks) + tail + outdoors()


def record(dry):
    """Rounds off the hardest peaks, then limits the band."""
    rounded = dry / (1 + (dry / .8) ** 4) ** .25
    low_pass = signal.firwin(511, BAND_EDGE_HZ, window=("kaiser", 9), fs=SR)
    return signal.oaconvolve(rounded, low_pass[None], "same")


dry = scene()
out = record(dry)
unload_audio(out)
```